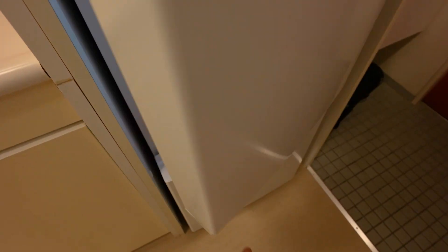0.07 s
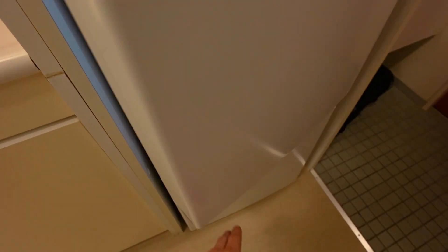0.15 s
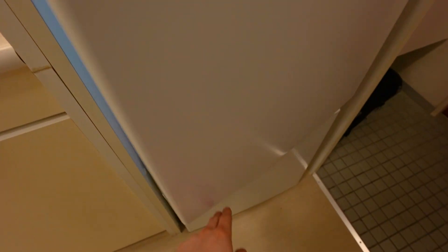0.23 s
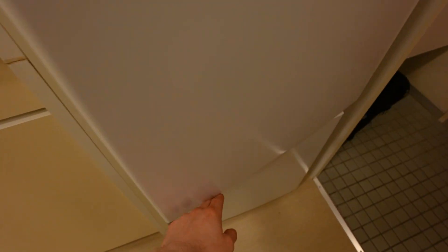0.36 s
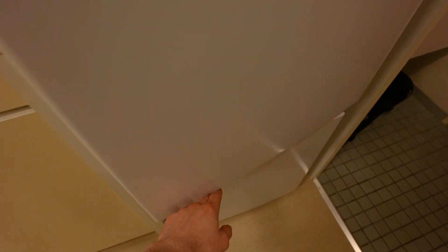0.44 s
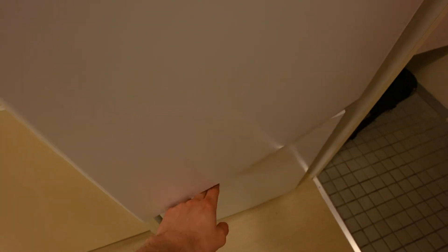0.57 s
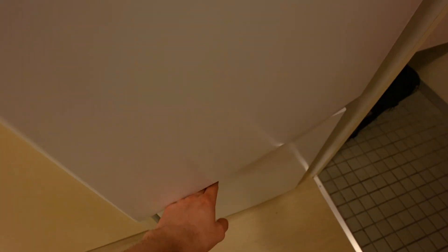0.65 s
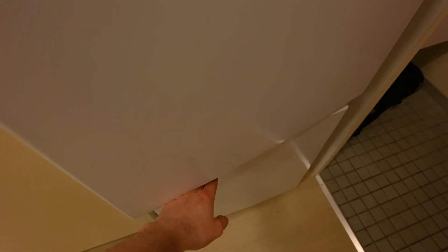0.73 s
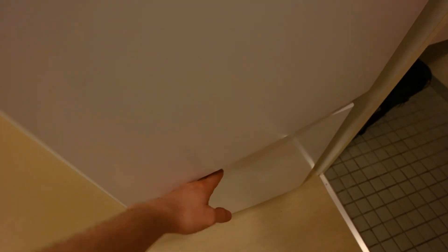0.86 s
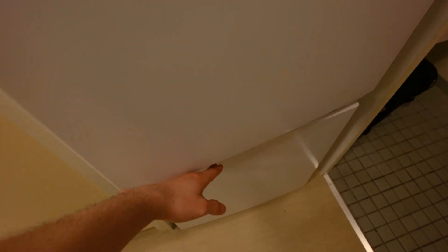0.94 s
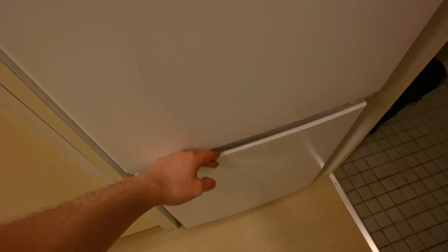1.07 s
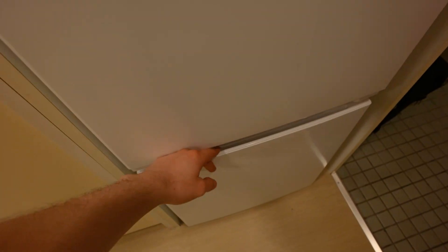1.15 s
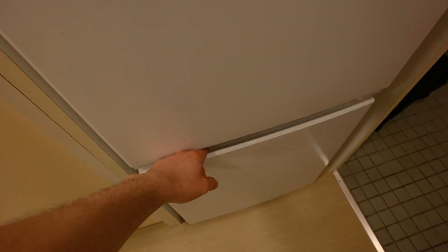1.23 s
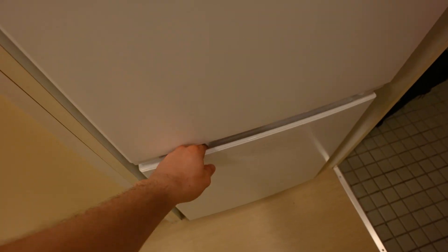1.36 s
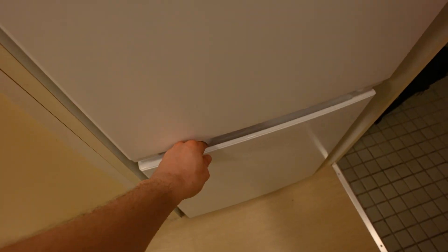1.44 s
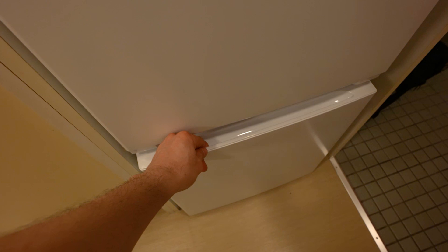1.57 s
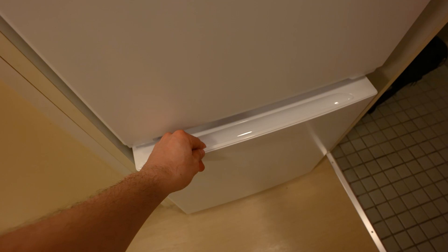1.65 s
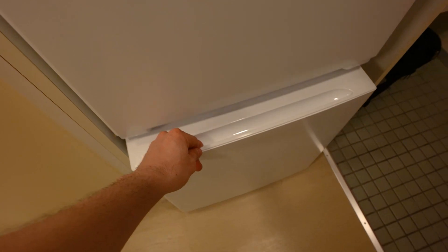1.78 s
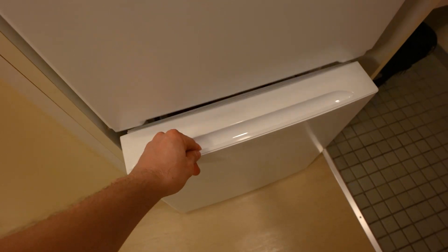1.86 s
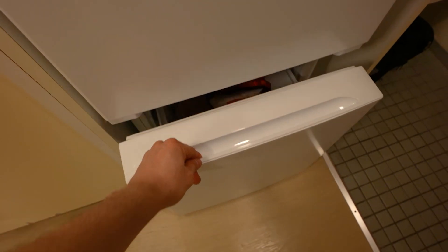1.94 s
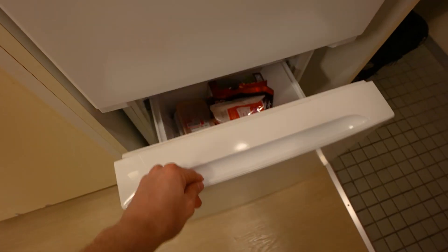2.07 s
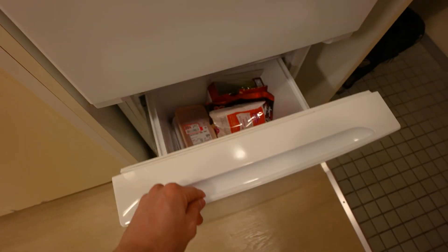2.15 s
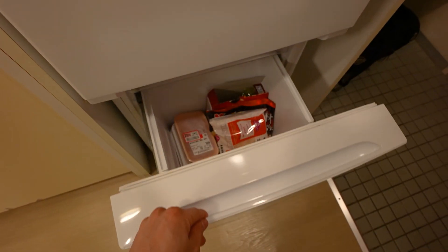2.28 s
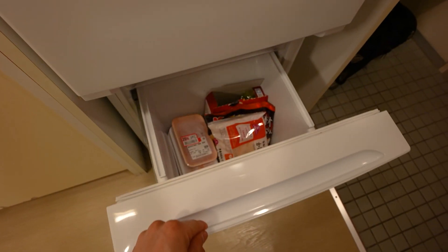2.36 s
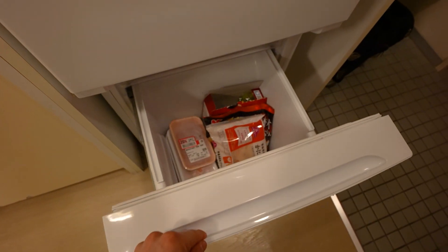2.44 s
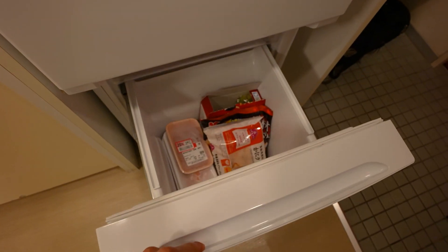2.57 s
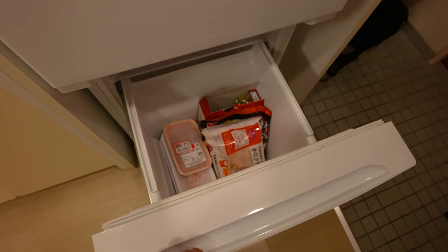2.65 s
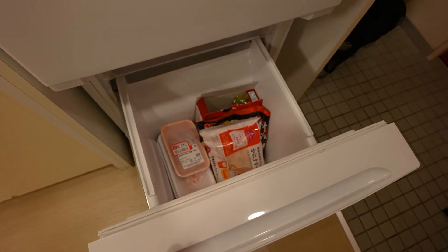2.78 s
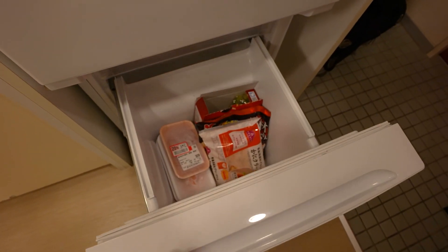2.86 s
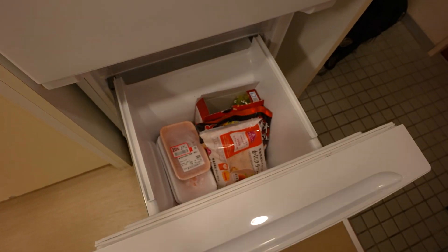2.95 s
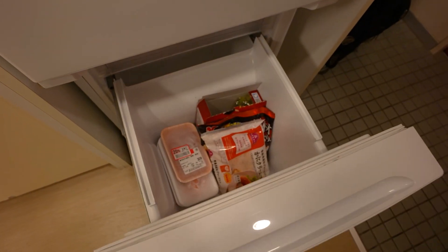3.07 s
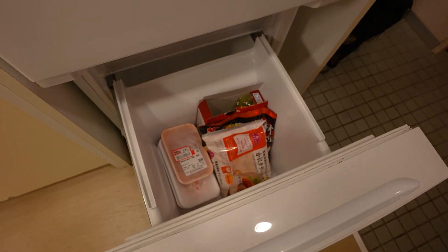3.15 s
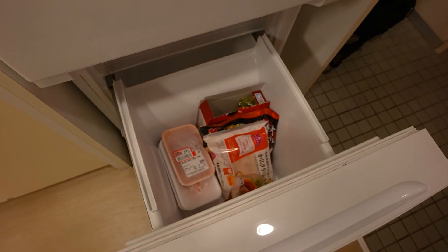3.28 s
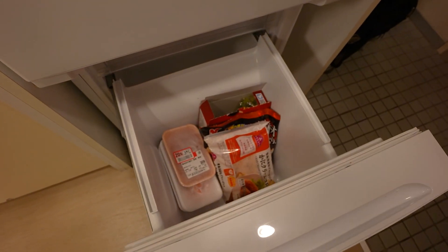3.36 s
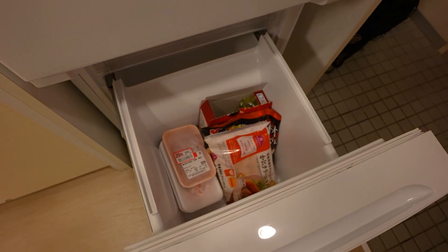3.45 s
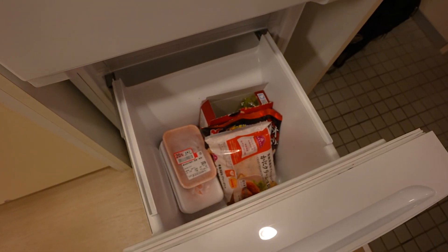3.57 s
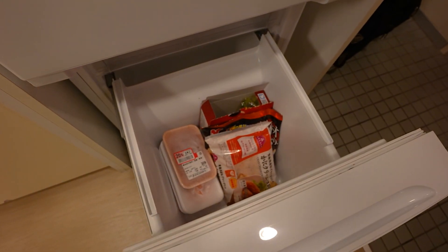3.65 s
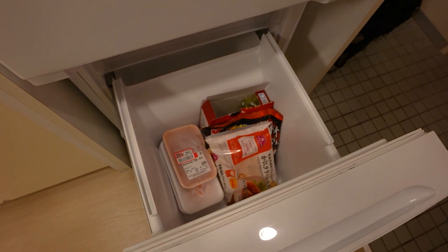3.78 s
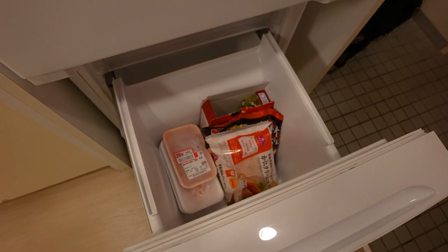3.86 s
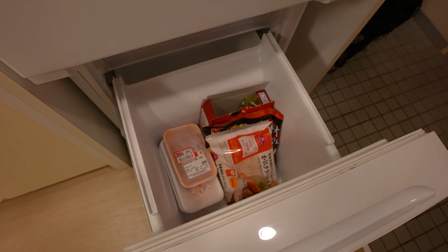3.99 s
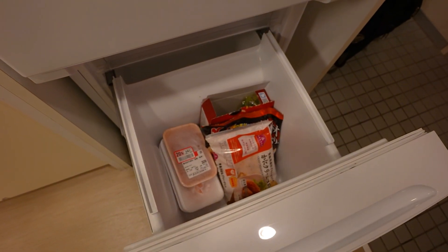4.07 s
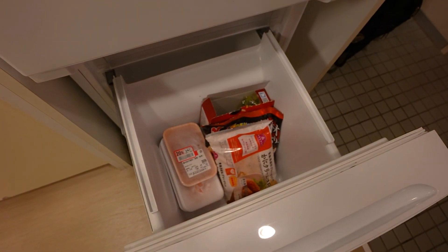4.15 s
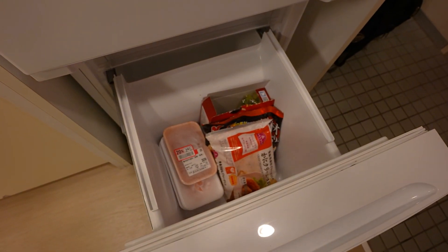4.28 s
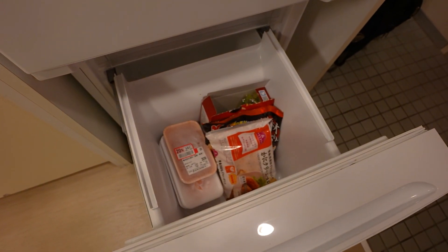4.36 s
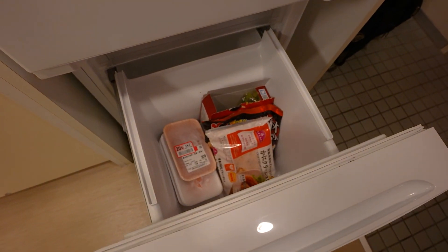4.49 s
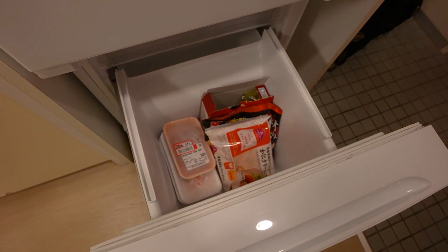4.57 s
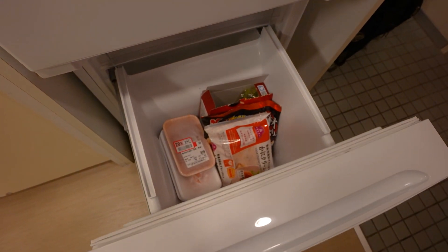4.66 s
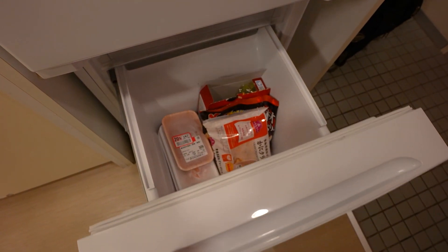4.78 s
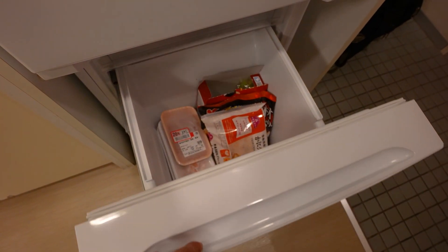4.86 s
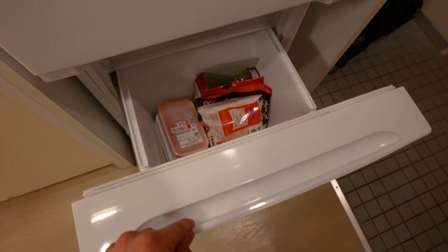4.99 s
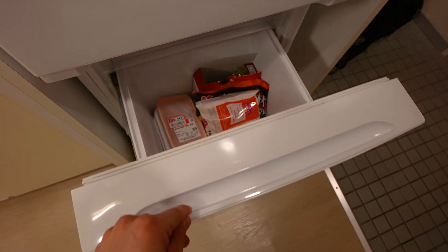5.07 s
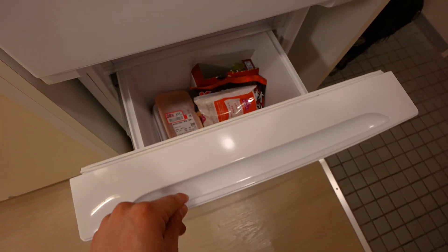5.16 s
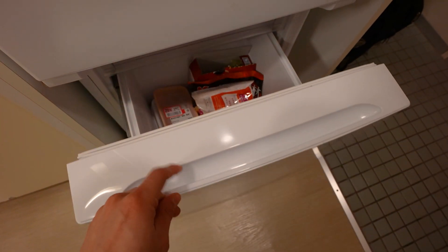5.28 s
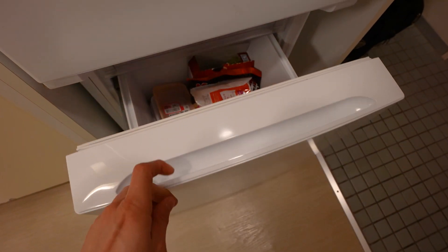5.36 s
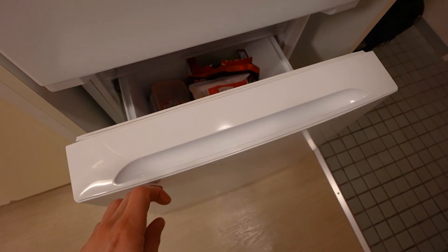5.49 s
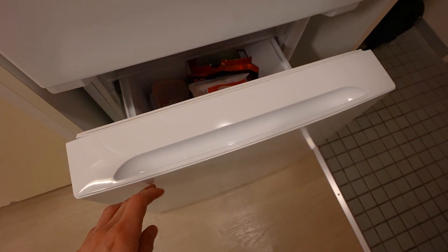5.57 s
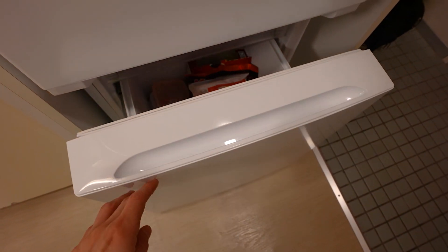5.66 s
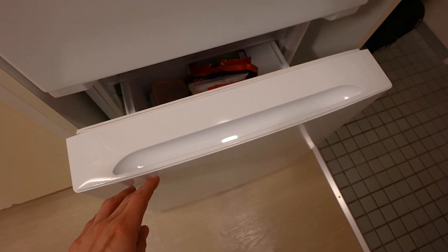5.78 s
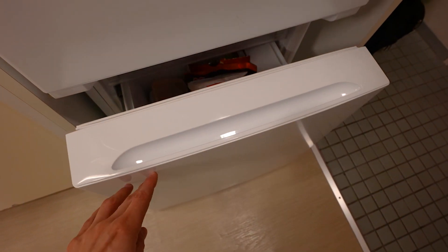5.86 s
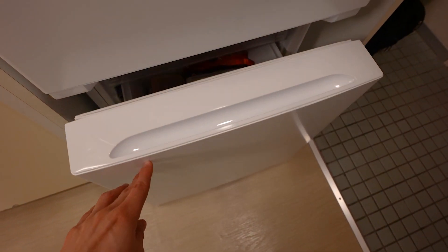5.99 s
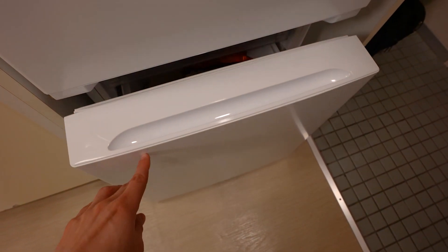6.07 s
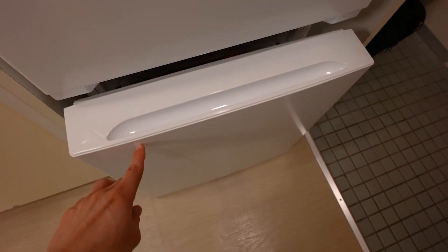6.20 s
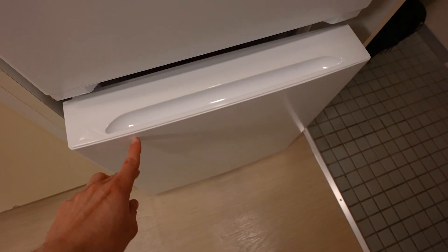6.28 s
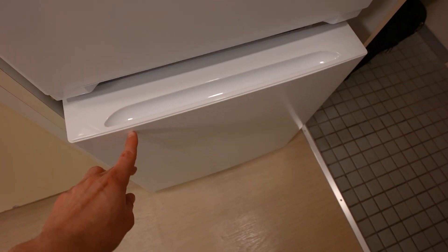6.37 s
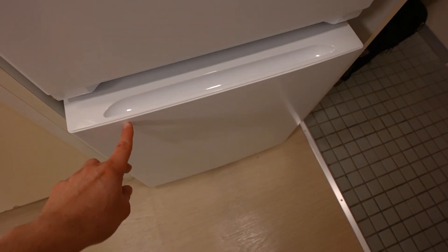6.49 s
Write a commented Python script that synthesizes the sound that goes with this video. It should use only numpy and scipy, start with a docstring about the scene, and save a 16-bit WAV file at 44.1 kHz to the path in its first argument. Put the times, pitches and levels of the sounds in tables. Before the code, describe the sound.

In a small humming kitchen, a freezer drawer unseals with a thump, rumbles out to a loud clattering bang, then slides back in quietly.

```python
"""A compressor hums in a small kitchen while a refrigerator door swings shut. Then a plastic freezer drawer is pulled:
its seal pops, it rolls, bangs on its stop, and is pushed back with small knocks.
Each knock is a burst of noise ringing the cabinet, box, walls and rails; rolling, air and hum are shaped noise
and wavering tones. The loudest blows overload the microphone."""
import sys
import numpy as np
from scipy import signal
from scipy.fft import rfft, irfft, next_fast_len
from scipy.io import wavfile
from scipy.ndimage import uniform_filter1d, map_coordinates

SR = 44100
rng = np.random.default_rng(int(sys.argv[2]) if len(sys.argv) > 2 else 0)


def generate_wav(sig):
    """Save sig (samples, or channels by samples) to the path in sys.argv[1] as 16-bit PCM at SR."""
    pcm = np.round(np.clip(np.atleast_2d(sig).T, -1, 1) * 32767).astype(np.int16)
    wavfile.write(sys.argv[1], SR, pcm)


def invert_db(level):
    """Linear amplitude ratio for a level in decibels (20 dB per decade), elementwise."""
    return 10 ** (np.asarray(level, dtype=float) / 20)


N = 287973  # length in samples

# Ringing of the steel runners. Each row: pitch in Hz, width in Hz, relative level in dB.
RAILS = [(1750, 170, 2), (2805, 75, -3.5), (4375, 360, -6), (5570, 480, -19), (7120, 200, -9),
         (7400, 77, -12), (8400, 177, -7)]


def unit(x):
    """Scales a sound to an rms of 1."""
    return x / np.sqrt(np.mean(x ** 2) + 1e-20)


def along(points, hz):
    """Reads a curve of (Hz, value) points on a log frequency axis."""
    f, v = np.transpose(points)
    return np.interp(np.log(hz + 1), np.log(f + 1), v)


def wobble(rate):
    """A smooth random curve with the given number of random points a second."""
    points = rng.standard_normal(int(N * rate / SR) + 4)
    return map_coordinates(points, [np.arange(N) * rate / SR])


def filtered(x, response):
    """Passes a sound through a filter given as a function of frequency."""
    n = x.shape[-1]
    padded_n = next_fast_len(n + 8192)
    hz = np.fft.rfftfreq(padded_n, 1 / SR)
    return irfft(rfft(x, padded_n) * response(hz), padded_n)[..., :n]


def modes(table):
    """Filter made of resonances: each rings at its own pitch, and a narrow one rings longer."""
    def response(f):
        total = 0
        for k, (hz, width, db) in enumerate(table):
            peak = 1j * f * width / (hz * hz - f * f + 1j * f * width)
            total = total + (-1) ** k * invert_db(db) * peak  # alternating signs
        return total
    return response


def colour(spectrum):
    """Filter that follows a curve of (Hz, dB) points."""
    return lambda hz: invert_db(along(spectrum, hz))


def stereo(pair, response):
    """Mixes two unrelated signals into a left and right that share more of the bass, then sets rms 1."""
    # Each row: frequency in Hz, likeness of left and right (1 = the same, 0 = unrelated).
    alike = [(60, 1), (330, 0.96), (480, 0.92), (1000, 0.69), (2000, 0.2), (4000, -0.12), (15000, 0.095)]

    def mid_and_side(hz):
        turn = np.arccos(np.clip(along(alike, hz), -1, 1)) / 2
        return response(hz) * np.array([np.cos(turn), np.sin(turn)])

    mid, side = filtered(pair, mid_and_side)
    return unit(np.array([mid + side, mid - side]))


def swells(table):
    """Sum of envelopes that climb to a peak and sink again at steady dB rates."""
    t = np.arange(N) / SR
    total = np.zeros(N)
    for peak_s, db, rise, fall in table:
        rate = np.where(t < peak_s, rise, fall)
        total += invert_db(db - np.abs(rate * (t - peak_s)))
    return total


def knocks():
    """Each knock is one blow and a dying rattle of contacts that drive every set of modes."""
    # Ringing of cabinet, drawer box and thin plastic walls.
    # Each row: pitch in Hz, width in Hz, relative level in dB.
    cabinet_modes = [(95, 22, -16.5), (122.6, 13, -7), (178, 8.1, -7.5), (221.2, 14.25, -5),
                     (259.5, 31, -18.5)]
    box_modes = [(290.4, 35, 0.5), (357.5, 26.3, -1), (404.2, 17, 2), (455, 25.6, 2), (556, 33, 1),
                 (627, 12.5, 4), (659, 36, 2), (730, 112, -2)]
    wall_modes = [(842, 155, 1), (1050, 147, 1.5), (1192, 118, 0.5), (1513, 106, -6), (1580, 98, -3.5),
                  (2030, 320, -9), (2456, 97, -10.5), (3700, 1700, -22.5), (4510, 300, -31.5)]
    # Sharp crack of the contact. Each row: frequency in Hz, relative level in dB per Hz.
    crack_tone = [(1530, -14.5), (2600, 0), (4350, -7.5), (5600, -3.5), (7560, -5), (14300, -6.5),
                  (15700, 0), (16300, -19)]

    out = np.zeros((2, N + SR))
    t = np.arange(SR // 3) / SR
    first_part = round(.03 * SR)  # the levels hold for the rms of the first 30 ms
    for s, box_db, favoured_hz, boom_db, clack_db, crack_db, t60, tilt_db in all_knocks():
        # where the blow lands picks the box modes
        box = [(hz, width, level - 17 * np.log2(hz / favoured_hz) ** 2) for hz, width, level in box_modes]
        walls = [(hz, width, level + tilt_db * np.log2(hz / 1000)) for hz, width, level in wall_modes]
        dull_hz = 9000 * invert_db(0.096 * (crack_db - clack_db - 7.0))  # the weaker the crack, the duller
        crack = lambda f: colour(crack_tone)(f) / (1 + (f / dull_hz) ** 2)
        # contacts come in lumps
        lumps_db = 5.36 * uniform_filter1d(rng.standard_normal(len(t)), size=90) * 8.4
        contacts = invert_db(lumps_db)
        # Each row: filter, level in dB, stretch of the rattle, strength of the first contact, rise in seconds.
        parts = [(soft(cabinet_modes, 410), boom_db, 1.1, 30, .0006),
                 (soft(box, 1380), box_db - 2.5, .99, 30, .002),
                 (soft(walls, 5000), clack_db, .9, 8, .002),
                 (crack, crack_db, .85, 1.5, .0015),
                 (soft(RAILS, 15000), crack_db - 6, 1.1, 1.1, .002)]
        for response, part_db, stretch, blow, rise in parts:
            decay = invert_db(-60 * t / (stretch * max(t60, .005)))
            rattle = rng.standard_normal((2, len(t))) * contacts * decay * (1 - np.exp(-t / rise))
            rattle[:, 8] += blow * np.sign(rattle[:, 8])  # first contact
            ring = stereo(rattle, response)
            ring = ring / np.sqrt(np.mean(ring[:, :first_part] ** 2))
            start = round(s * SR)
            out[:, start:start + len(t)] += invert_db(part_db - 5.5) * ring
    return out[:, :N]


def all_knocks():
    """Lists blows, bumps and chance jolts with the force each gives to the parts that ring."""
    # Hard blows of door and drawer body on frame and stops; levels are before the trims in knocks().
    # Each row: start in seconds, box level in dB, favoured box pitch in Hz, boom level in dB, clack level in dB.
    blows = [(0.359, -24.5, 455, -28.5, -32), (1.152, -10, 470, -7.5, -6.5), (1.21, -28, 285, -16.5, -23),
             (1.249, -8, 268, -11.5, -20), (1.462, -28, 452, -26.5, -24.5), (1.604, -9, 320, -13.5, -22.5),
             (2.084, 7.5, 427, -7, -10.5), (2.132, -3, 444, -21, -21.5), (2.156, 6.5, 428, -4.5, -14),
             (2.185, 2.5, 449, -10, -18.5), (2.209, -4.5, 412, -22, -32.5), (2.244, -22, 420, -33, -28),
             (3.16, -14, 258, -23, -35), (3.189, -20, 633, -30, -27), (3.247, -19.5, 268, -19, -28),
             (3.283, -26, 450, -24, -34), (5.999, -3, 448, -12, -33)]
    # Lighter bumps of fingers, rollers and contents; levels are before the trims in knocks().
    # Each row: start in seconds, box level in dB, boom level in dB, clack level in dB, crack level in dB.
    bumps = [(0.219, -36, -35, -52.5, -51), (0.899, -56, -47, -54, -52.5), (0.94, -33, -44, -29.5, -52),
             (1.019, -31.5, -34, -42.5, -44.5), (1.05, -31.5, -25, -38, -54), (1.08, -24, -35, -26.5, -49),
             (1.351, -29, -27.5, -31, -39), (1.394, -27.5, -31, -28, -57), (1.488, -31, -22, -62, -38),
             (1.55, -27, -28, -38, -43), (1.65, -14.5, -38, -28.5, -56), (1.789, -17.5, -40, -22.5, -42),
             (1.854, -9.5, -20, -18.5, -38.5), (2.42, -36, -42.5, -54, -45),
             (3.979, -49.5, -42.5, -52.5, -70), (4.739, -35.5, -28.5, -64, -76),
             (4.848, -28, -54, -56, -69), (4.986, -26, -45, -43, -60), (5.058, -30.5, -27.5, -56, -60),
             (5.315, -36, -26, -30, -45.5), (5.35, -39, -52, -37, -47), (5.584, -47, -29.5, -41, -52),
             (5.701, -34.5, -31, -36.5, -47.5), (5.749, -43, -39, -38.5, -50),
             (5.872, -22.5, -21, -31.5, -45), (6.422, -15.5, -20, -30, -57),
             (6.486, -21.5, -37, -31, -51.5)]

    # a blow's rattle lasts at most 0.18 s, or 4.9 times the gap to the next blow, before each part stretches it
    blow_t60_s, cut_short = 0.18, 4.9
    gaps = np.diff([row[0] for row in blows] + [N / SR])
    knock_list = []
    for row, gap in zip(blows, gaps):
        crack_db = row[-1] - 5.5
        knock_list.append((*row, crack_db, min(blow_t60_s, cut_short * gap), 0))

    # small chance jolts come more often when the rolling is hard
    jolt_count = 12
    jolt_db = np.array((-1.5, -11, -29, -21))  # box, boom, clack and crack over the rolling
    level_db = rolling_db()[:-SR // 10]
    travel = np.cumsum(invert_db(level_db) ** .5)
    places = travel[-1] * (np.arange(jolt_count) + rng.random(jolt_count)) / jolt_count
    at = np.searchsorted(travel, places).clip(max=len(travel) - 1)
    jolts = [(i / SR, *(level_db[i] + jolt_db)) for i in at]

    bump_hz, bump_t60_s = 400, 0.14  # favoured box pitch; rattle before each part stretches it
    for s, box_db, boom_db, clack_db, crack_db in bumps + jolts:
        # harder bumps favour the high wall modes, in dB an octave
        tilt_db = 0.53 * np.clip(crack_db - clack_db + 23, 0, 15)
        knock_list.append((s, box_db, bump_hz, boom_db, clack_db, crack_db, bump_t60_s, tilt_db))
    return knock_list


def soft(table, top_hz):
    """Resonances struck at a new spot, through a yielding contact that passes nothing sharp."""
    struck = [(hz, width, db + rng.normal(0, 1.9)) for hz, width, db in table]

    def response(f):
        yielding = 1 / (1 + 1j * f / top_hz) ** 2
        less_bass = 1j * f / (70 + 1j * f)
        return modes(struck)(f) * yielding * less_bass
    return response


def seal():
    """Air rushes in through the opened gap and the cabinet pressure swings, slowing to a steady pitch."""
    # One row: inrush level in dB, its time to fall 60 dB in seconds, suction peak level in dB,
    # its time to fall 60 dB in seconds, final suction pitch in Hz.
    inrush_db, inrush_t60, suction_db, suction_t60, suction_hz = (-17.5, .5, -21.5, 1, 27.5)
    # Rushing air. Each row: frequency in Hz, relative level in dB per Hz.
    inrush_tone = [(1470, -38.5), (2500, -1), (3040, -57.5), (3740, -20), (4510, -11), (5440, 0),
                   (6110, -2), (10100, -34), (16000, -57)]

    seal_s = 1.154  # when the seal lets go
    t = np.maximum(np.arange(N) / SR - seal_s, 0)
    inrush_level = invert_db(inrush_db - 60 * t / inrush_t60) * (1 - np.exp(-t / 0.0071))
    inrush = stereo(rng.standard_normal((2, N)), colour(inrush_tone)) * inrush_level
    swings = suction_hz * (t + 0.015 * (1 - np.exp(-t / .02)))  # faster at first
    suction = invert_db(suction_db - 60 * t / suction_t60) * np.sin(2 * np.pi * swings)
    return inrush + suction


def motion():
    """Rollers bump along the rails and shake the box; gritty rubbing rings the runners, air hisses on top."""
    # Colours of rolling, rubbing, hiss and swishes. Each row: frequency in Hz, relative level in dB per Hz.
    roll_tone = [(41, -64), (70, -63), (107, -5), (151, -8), (215, -3.5), (254, 0.5), (411, -4),
                 (459, -5.5), (648, -10), (708, -9), (1000, -21.5), (1300, -38), (2200, -120)]
    rub_tone = [(470, -55), (800, -10.5), (1020, -5.5), (1350, -11.5), (1550, -13.5), (2690, -18),
                (4000, -29.5), (5200, -65), (8800, -120)]
    hiss_tone = [(1760, -36), (3000, 1), (4860, 0), (6040, -0.5), (7200, -1.5), (8950, -10.5), (15100, -23),
                 (16000, -23.5)]
    swish_tone = [(530, -35), (900, -9.5), (1770, -2.5), (3590, -9), (4860, -9), (6030, -4.5), (7230, -9),
                  (15100, -13.5), (16000, -19)]
    # Swishes of air at the door gap and of packets shifting.
    # Each row: peak in seconds, level in dB, rise in dB a second, fall in dB a second.
    swishes = [(0.0, -45.5, 50, 70), (.4, -47.5, 118, 42.5), (.54, -45.5, 50.5, 46.5),
               (1.36, -46.5, 200, 121), (1.48, -32.5, 499.5, 300), (1.9, -51.5, 26, 38),
               (2.2, -31.5, 92, 110), (2.4, -53, 40, 50.5), (3.29, -47.5, 200, 148), (5.15, -54, 45.5, 40)]

    # each dB of rolling adds 0.91 dB of rubbing and 0.45 dB of hiss
    roll_db = rolling_db()
    over_steady_db = roll_db + 30
    rub_db = -44 + 0.91 * over_steady_db
    hiss_db = -63 + .45 * over_steady_db

    # uneven levels in dB
    bumps = wobble(45)
    grit = 1.2 * bumps + 2.4 * wobble(200) + 1.5 * wobble(12)
    flutter = 0.1 * bumps + 0.85 * wobble(75)

    noise = rng.standard_normal((5, 2, N))
    roll = stereo(noise[0] * invert_db(1.5 * bumps), colour(roll_tone))
    rub = stereo(noise[1] * invert_db(grit), colour(rub_tone))
    rub = rub + invert_db(-18.5) * stereo(noise[3] * invert_db(grit), modes(RAILS))
    hiss = stereo(noise[2] * invert_db(flutter), colour(hiss_tone))
    swish = stereo(noise[4] * invert_db(.9 * wobble(60)), colour(swish_tone))
    return invert_db(roll_db) * roll + invert_db(rub_db) * rub + invert_db(hiss_db) * hiss + swells(swishes) * swish


def rolling_db():
    """Level of the rolling over time: faster or harder movement is louder."""
    # Movement of the door, then of the drawer. Each row: time in seconds, rolling rumble in dB.
    rolling = [(0, -49.5), (.27, -57.5), (.45, -42), (.82, -59.5), (1.11, -40), (1.221, -16.5), (1.36, -40),
               (1.6, -24), (1.852, -27.5), (2.07, -17.5), (2.219, -18.5), (2.47, -30.5), (2.93, -47),
               (4.67, -51), (4.91, -30), (5.49, -30), (5.8, -46), (6.04, -29), (6.2, -38), (6.53, -37.5)]
    return np.interp(np.arange(N) / SR, *np.transpose(rolling))


def squeaks():
    """Faint runner squeaks: tones blurred by random wavering, sagging in pitch."""
    # Each row: start in seconds, end in seconds, starting pitch in Hz, rate of the blur in Hz,
    # level in dB before fading and wavering.
    squeak_list = [(2.2, 2.34, 1770, 150.5, -41), (1.9, 2.7, 3000, 800, -41), (2.25, 3.4, 2990, 140, -62),
                   (4.85, 5.9, 2950, 1100, -50), (2.4, 3.5, 6800, 450, -67), (5.872, 5.99, 3900, 1100, -52),
                   (4.499, 4.8, 7050, 200, -73), (4.86, 5.3, 7400, 1600, -59.5),
                   (4.95, 5.7, 6000, 1200, -65), (5.07, 5.118, 11500, 400, -58)]

    sag = 0.046  # share of pitch lost by the end
    t = np.arange(N) / SR
    out = np.zeros((2, N))
    for start, end, hz, width_hz, db in squeak_list:
        part = np.clip((t - start) / (end - start), 0, 1)
        turns = np.cumsum(hz * (1 - sag * part)) / SR
        fuzz = np.array([wobble(width_hz) + 1j * wobble(width_hz) for side in "LR"])
        tone = np.real(fuzz * np.exp(2j * np.pi * turns))
        fade = np.sin(np.pi * part ** .55) ** 1.5
        out += invert_db(db + 2 * wobble(20)) * fade * tone
    return out


def sway():
    """Moving door and drawer push air about: a low rumble, strongest near 30 and 90 Hz, mostly just under the rolling."""
    # Pushes of air and cabinet sway. Each row: peak in seconds, level in dB, rise and fall in dB a second.
    pushes = [(.45, -46, 0, 60), (1.25, -42, 61.5, 40), (1.65, -40.5, 21, 27), (2.2, -47, 59, 62),
              (3.35, -56, 30, 33)]
    # Each row: frequency in Hz, relative level in dB per Hz.
    sway_tone = [(15, -24), (30, 4.5), (60, -14.5), (90, 10), (130, -18), (200, -84)]
    level = invert_db(-68) + swells(pushes)  # a faint rest level stays throughout
    return level * stereo(rng.standard_normal((2, N)), colour(sway_tone))


def background():
    """Wavering compressor lines, each a tone in a halo of narrow noise, over the noise of the kitchen."""
    # Compressor. Each row: pitch in Hz, level in dB before halo and escape, width of the halo in Hz.
    hum_lines = [(50, -62, 4), (100, -53, 8), (219, -42.5, 16), (322, -52, 16), (430, -65, 5)]
    # Hum escaping through the open compartments. Each row: time in seconds, gain in dB.
    escape = [(0, -4), (.8, -29), (1.1, -30), (2.4, -0.5), (5.0, 0.5), (6.53, -8)]
    # Kitchen noise. Each row: frequency in Hz, relative level in dB per Hz.
    floor_tone = [(12, -56), (20, -36), (102, -6.5), (159, 2.5), (217, -2), (330, 1), (391, -31),
                  (1040, -29), (1300, -29.5), (2420, -31), (4240, -53), (15000, -39), (16300, -82)]

    t = np.arange(N) / SR
    hum = np.zeros(N)
    for hz, db, width_hz in hum_lines:
        halo = 0.9 * (wobble(2 * width_hz) + 1j * wobble(2 * width_hz))
        hum += invert_db(db) * np.sqrt(2) * np.real((0.8 + halo) * np.exp(2j * np.pi * hz * t))
    escape_db = np.interp(t, *np.transpose(escape))
    room_noise = invert_db(-45) * stereo(rng.standard_normal((2, N)), colour(floor_tone))
    return invert_db(escape_db) * hum + room_noise


def kitchen(x):
    """The room's answer, each frequency dying at its own speed."""
    # Each row: frequency in Hz, time to fall 60 dB in seconds.
    t60_curve = [(150, 0.29), (1000, 0.32), (5000, 0.22), (14000, 0.22)]

    # drawn afresh every sixteenth of a second, so that no single random tail colours all knocks
    hop = SR // 16
    out = np.zeros((2, N + SR))
    padded = np.pad(x, ((0, 0), (hop + 250, 2 * hop)))  # the answer starts 250 samples late
    for start in range(0, N, hop):
        hz, t, z = signal.stft(rng.standard_normal((2, SR // 3)), SR, nperseg=256)
        decay = invert_db(-60 * t / along(t60_curve, hz)[:, None])
        tail = signal.istft(z * decay, SR, nperseg=256)[1]
        tail = stereo(tail, lambda f: f / (f + 250)) / np.sqrt(tail.shape[1])  # less bass
        piece = padded[:, start:start + 2 * hop] * np.hanning(2 * hop)  # cross-fades the pieces
        answer = signal.fftconvolve(piece, tail, axes=1)
        out[:, start:start + answer.shape[1]] += answer
    return out[:, hop:N + hop]


def scene():
    """Adds all sources; the room answers the knocks and the seal."""
    blows = knocks() + seal()
    return blows + invert_db(-4.0) * kitchen(blows) + motion() + sway() + squeaks() + background()


def roll_off(x):
    """The treble ends steeply here."""
    return signal.sosfilt(signal.butter(12, 16430, fs=SR, output="sos"), x)


def record(dry):
    """The two microphone ports differ a little in colour; the input overloads at full scale."""
    # Each row: frequency in Hz, left minus right in dB.
    lean = [(60, 0), (250, 0), (550, -1), (1650, -1.5), (5000, -1), (15000, -1.5)]
    ports = filtered(dry, lambda hz: invert_db(np.outer([.5, -.5], along(lean, hz))))
    clipped = ports / (1 + np.abs(ports) ** 16) ** (1 / 16)
    return roll_off(clipped)


dry = scene()
out = record(dry)
generate_wav(out)
```